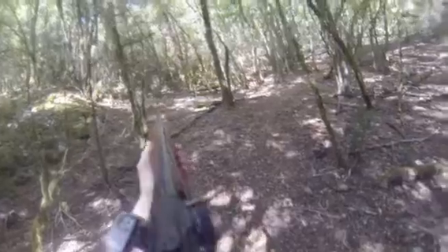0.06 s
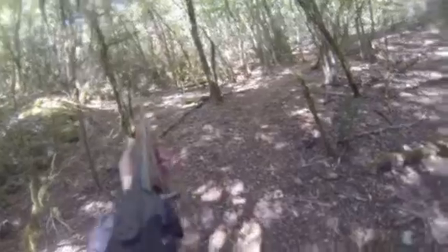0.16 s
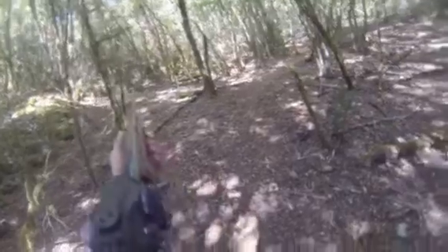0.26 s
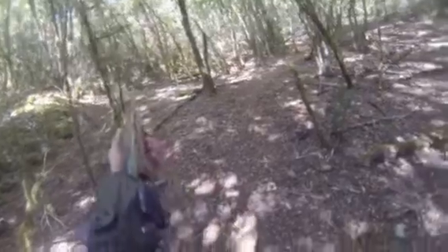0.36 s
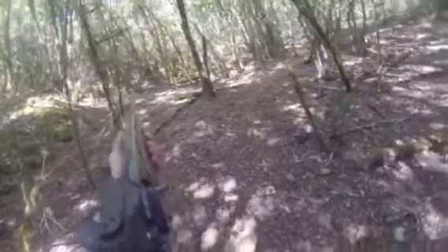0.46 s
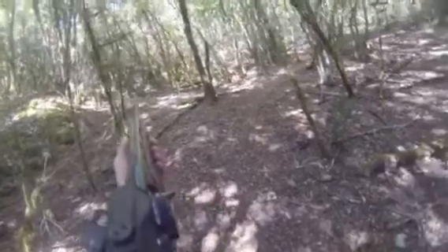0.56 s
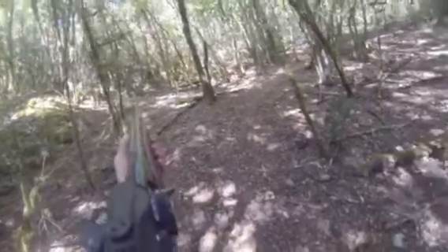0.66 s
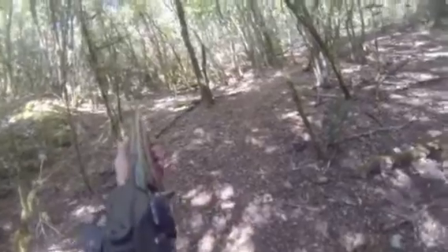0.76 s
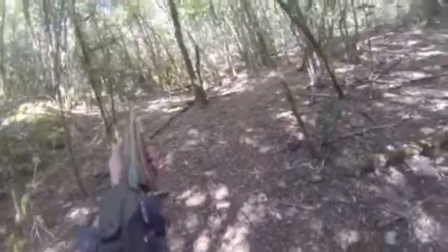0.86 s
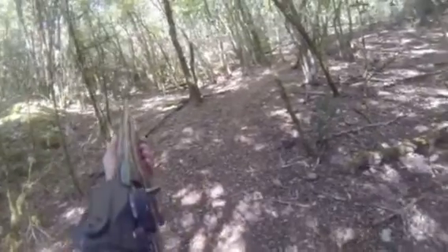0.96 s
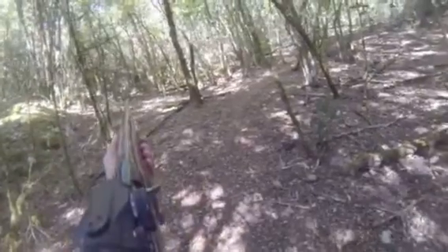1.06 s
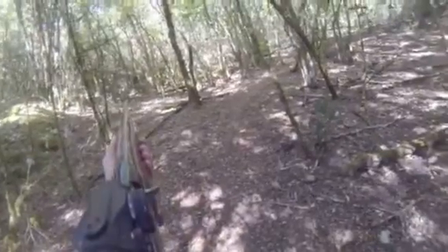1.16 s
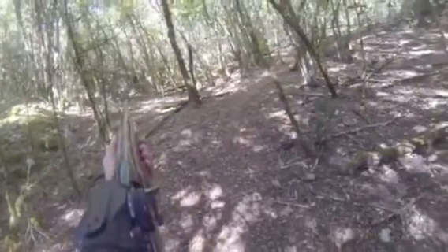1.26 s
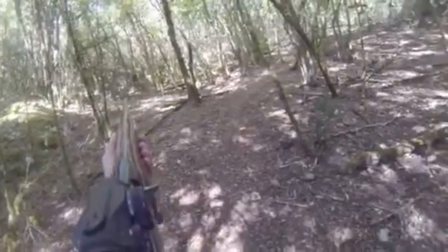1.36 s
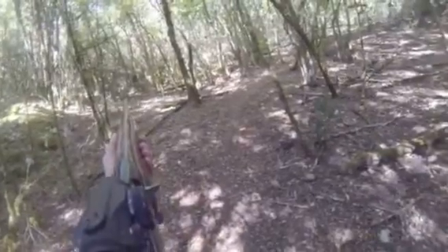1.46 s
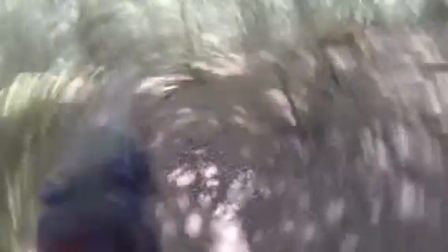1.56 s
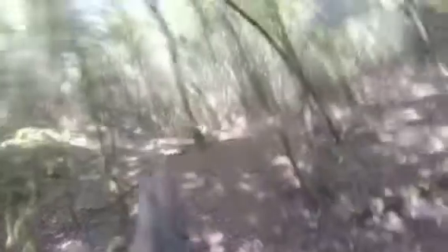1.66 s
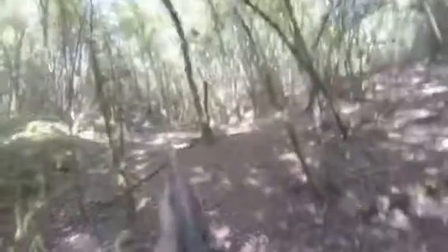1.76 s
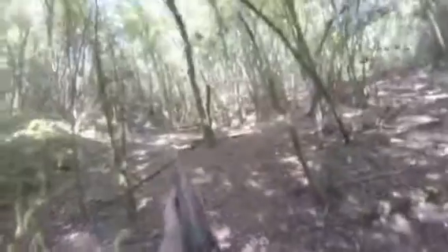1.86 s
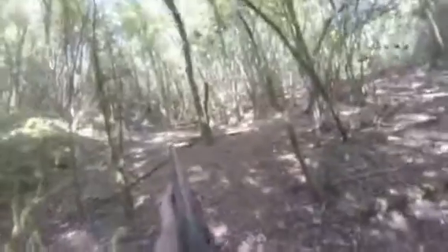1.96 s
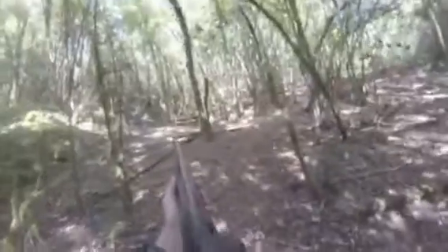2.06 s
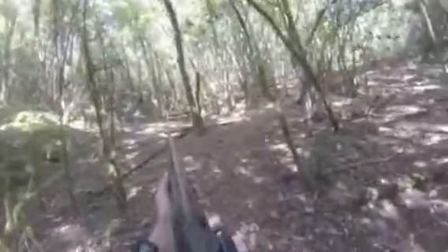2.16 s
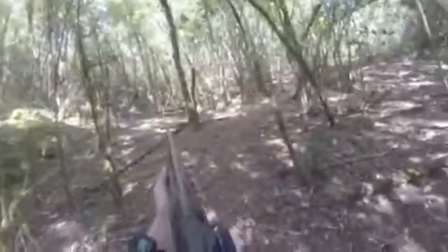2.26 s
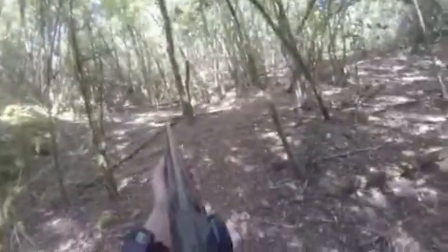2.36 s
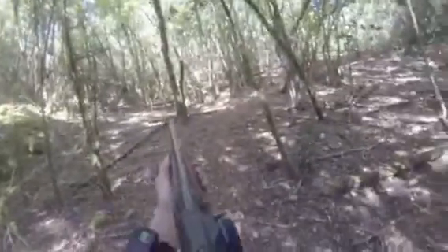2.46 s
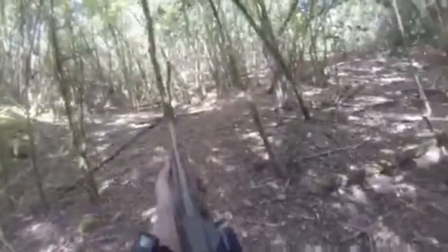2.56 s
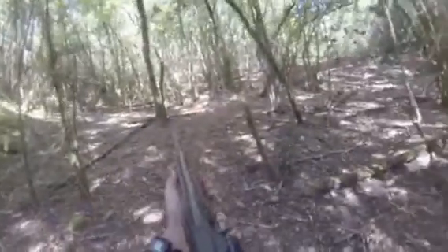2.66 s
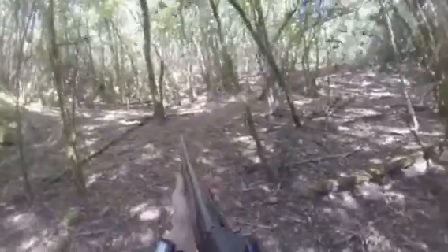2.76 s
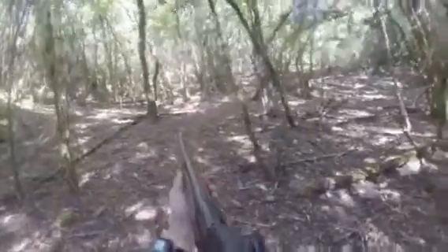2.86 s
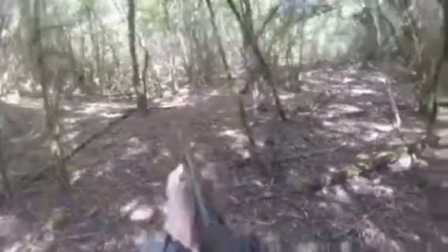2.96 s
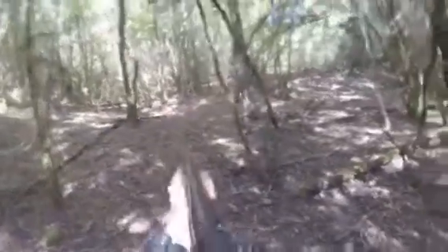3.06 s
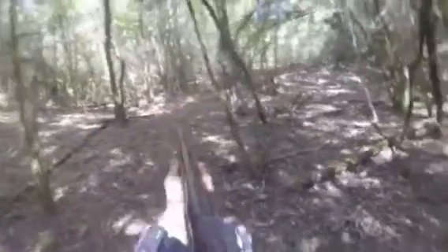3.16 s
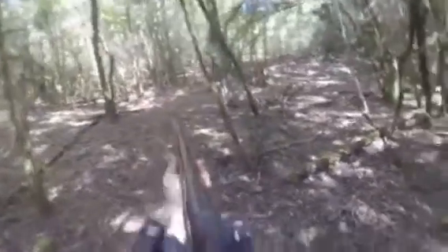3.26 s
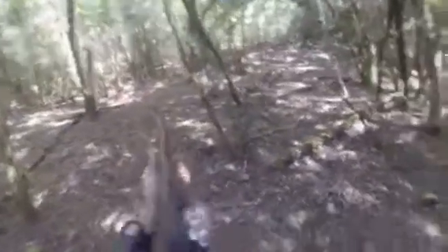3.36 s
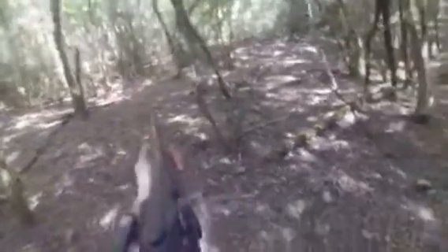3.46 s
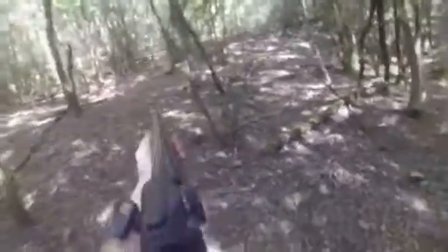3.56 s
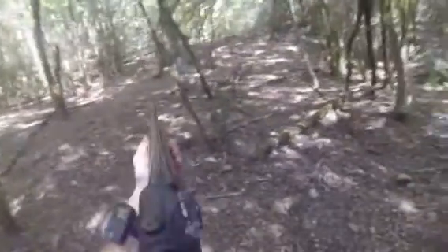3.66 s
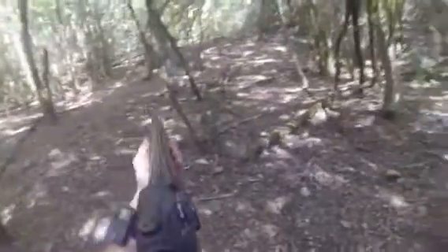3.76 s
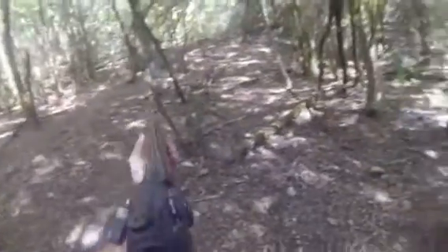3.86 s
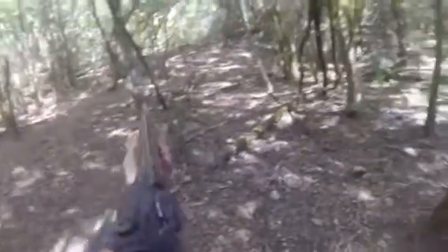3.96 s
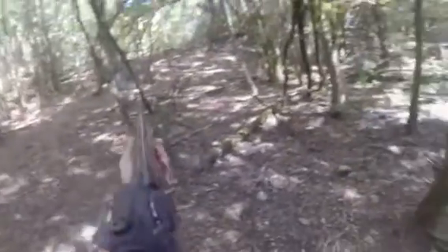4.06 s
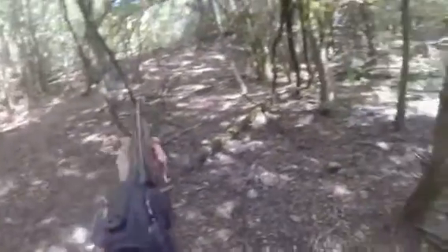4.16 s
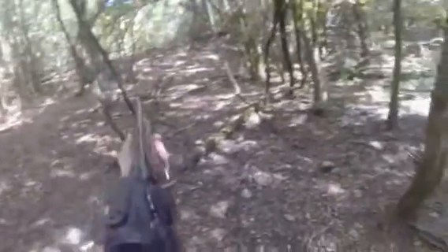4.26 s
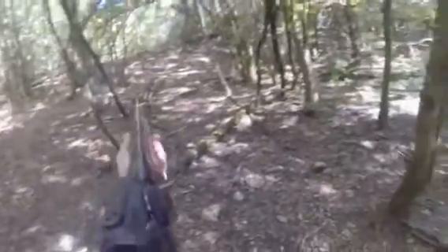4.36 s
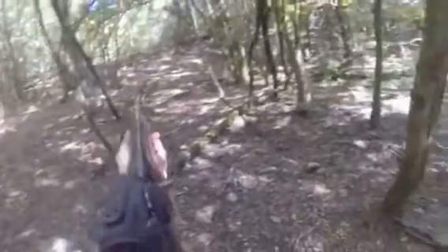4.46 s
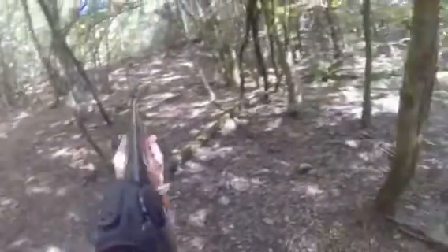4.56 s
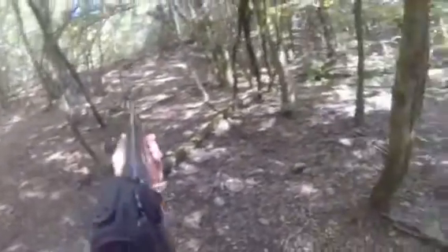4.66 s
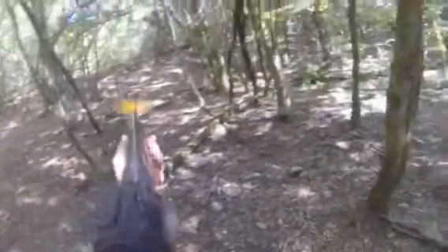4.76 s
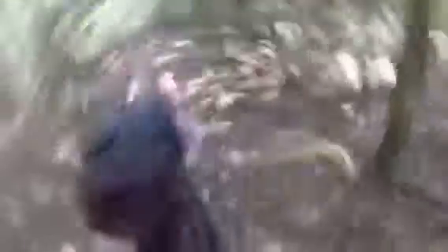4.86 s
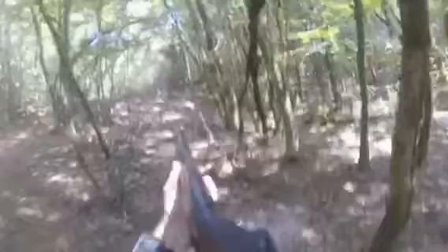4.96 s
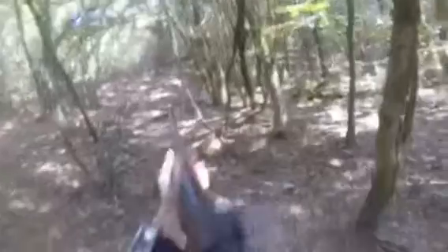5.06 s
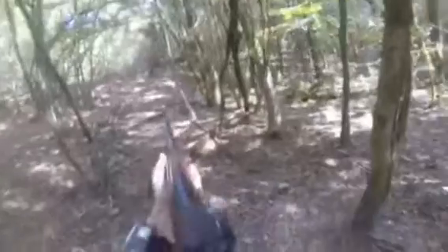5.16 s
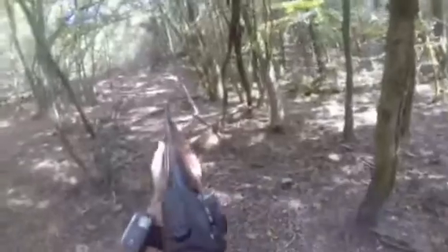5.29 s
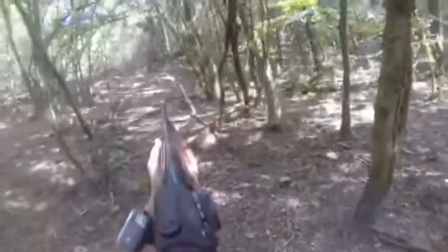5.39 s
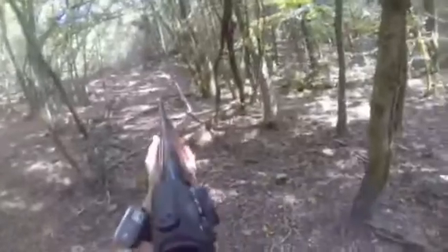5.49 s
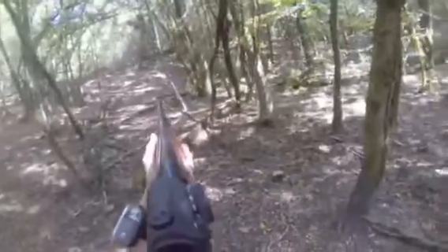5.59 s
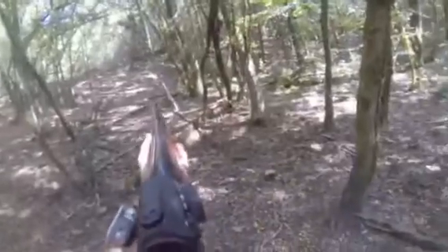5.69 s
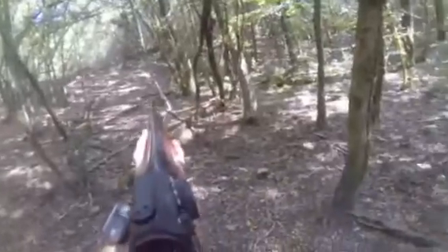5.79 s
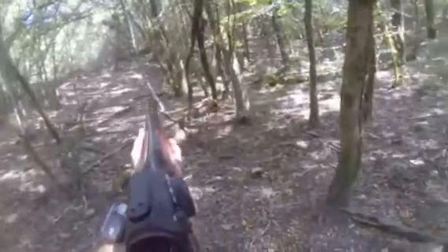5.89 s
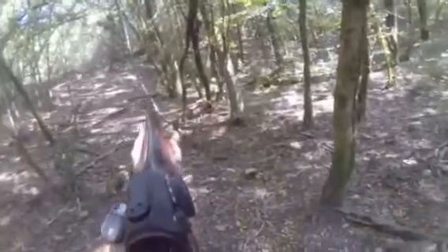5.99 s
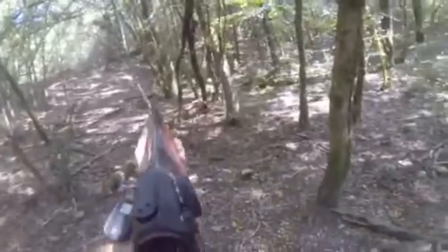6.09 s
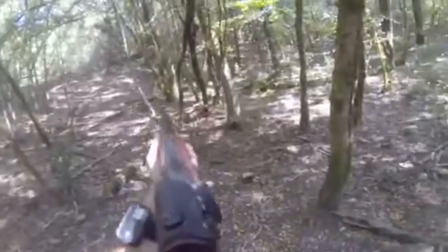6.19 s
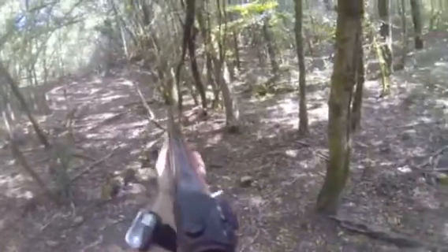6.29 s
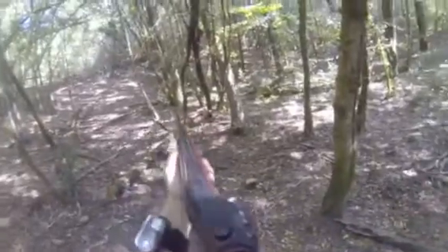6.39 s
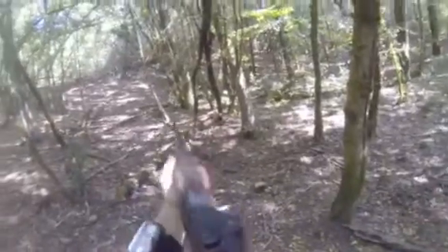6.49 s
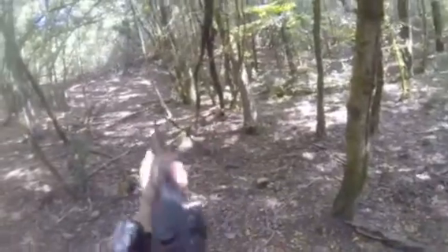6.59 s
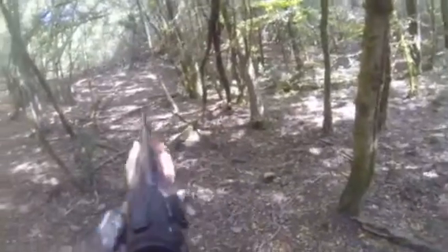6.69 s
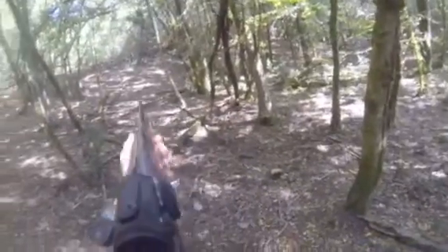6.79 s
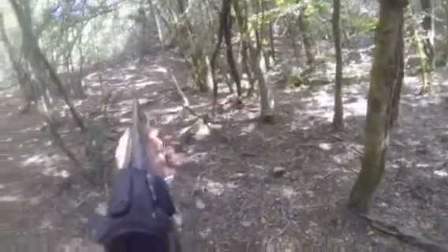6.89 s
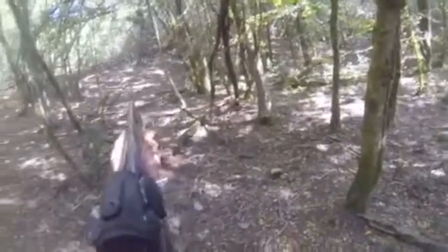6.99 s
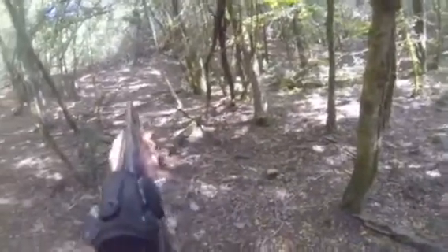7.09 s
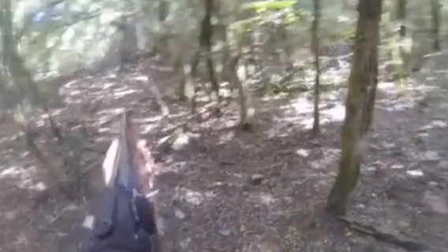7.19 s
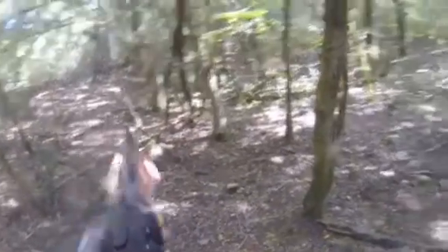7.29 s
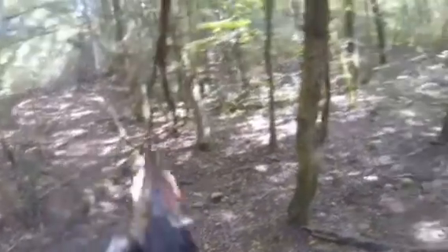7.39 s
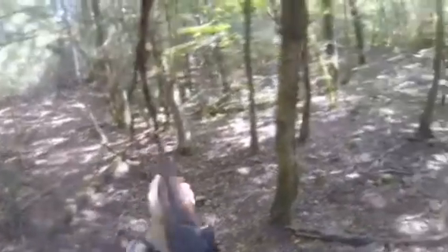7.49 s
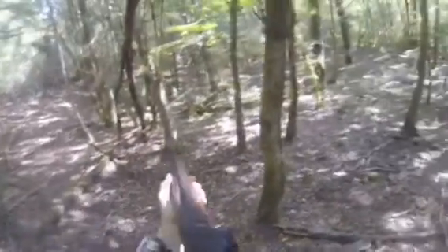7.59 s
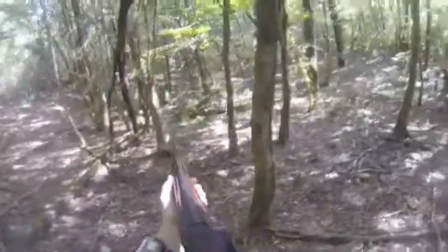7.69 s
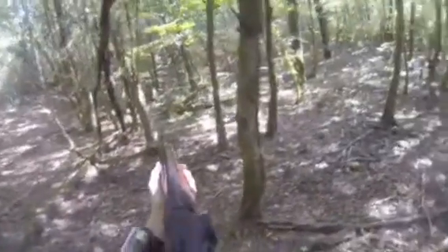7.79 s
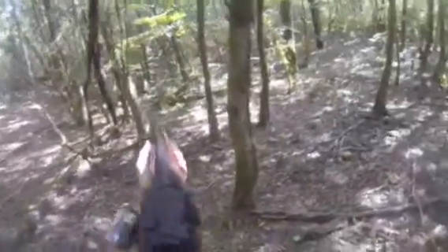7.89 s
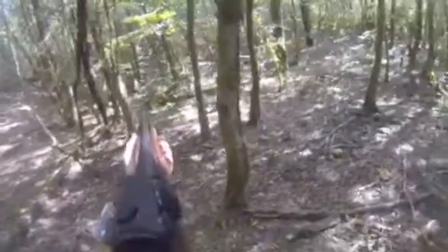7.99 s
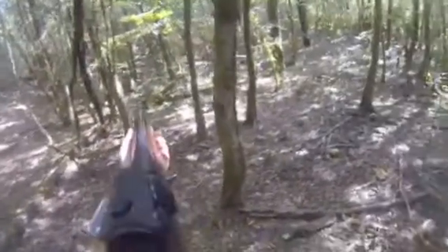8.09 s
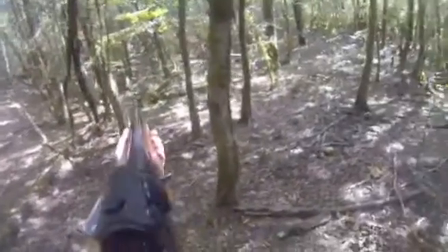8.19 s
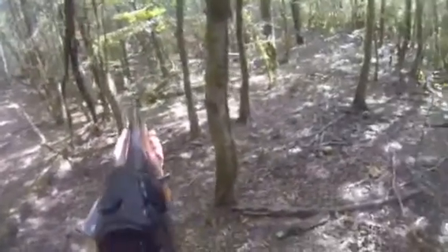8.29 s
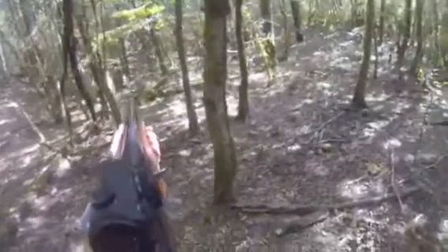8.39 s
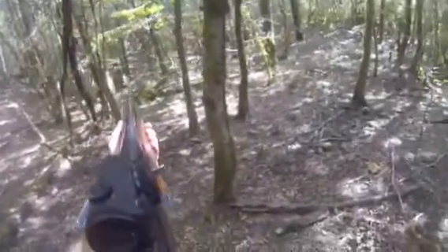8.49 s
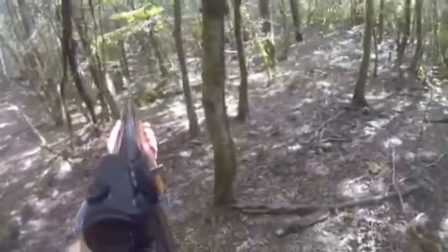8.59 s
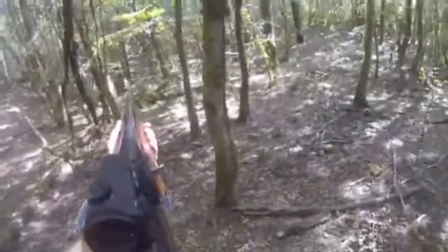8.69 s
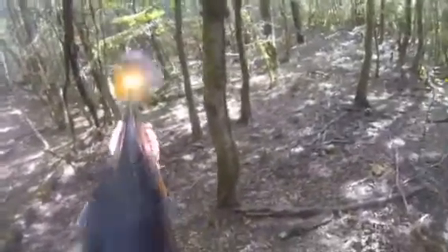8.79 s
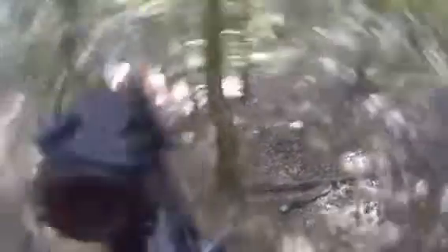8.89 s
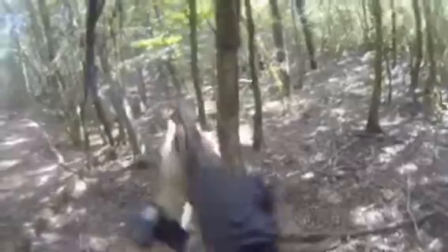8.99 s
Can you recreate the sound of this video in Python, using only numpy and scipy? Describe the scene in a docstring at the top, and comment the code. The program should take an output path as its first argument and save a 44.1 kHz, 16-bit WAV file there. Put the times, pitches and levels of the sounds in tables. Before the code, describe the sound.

A quiet wood gives a soft, steady hush, with a faint shuffle in leaves at the start. At about 1.5 seconds a shotgun fires very close, a sharp crack that overloads the microphone, followed instantly by a slight shell ping and the clack of the bolt closing. The echo swells through the trees and rolls away, growing duller. Around 3 seconds air buffets the microphone with a brief low rumble, and feet crunch softly on dry leaves until about 4 seconds. Faint clothing rustle, twig snaps and small gear clicks continue between shots. A second blast and bolt clack come at 4.8 seconds, with a few hollow, distant slaps in the echo near 5.8 seconds. Light rustling and tiny snaps carry on until the third shot at about 8.9 seconds, which rings into the trees at the end.

```python
"""A quiet wood, a breeze on the microphone and a shuffle in dry leaves; then three shotgun shots.
A small camera on the shooter's head hears the hammer click, the blast overload it and the shell fly out;
after the first two shots the self-loading bolt slams shut. A near bank, the trunks and a far slope throw
each shot back ever duller, while gain control ducks and lets the echo swell up. Between shots the
shooter turns on dry leaves, clothes rustling, twigs snapping and air buffeting the microphone."""
import sys
import numpy as np
from scipy import signal
from scipy.fft import rfft, irfft, next_fast_len
from scipy.io import wavfile
from scipy.ndimage import uniform_filter1d, minimum_filter1d

SR = 44100
rng = np.random.default_rng(int(sys.argv[2]) if len(sys.argv) > 2 else 0)


def file_out(sig):
    """Save sig as 16-bit WAV at sys.argv[1]."""
    # one column per channel
    cols = np.atleast_2d(sig).T
    # limit, then scale
    lim = np.clip(cols, -1, 1)
    pcm = np.round(lim * 32767).astype(np.int16)
    wavfile.write(sys.argv[1], SR, pcm)


N = 398663
T = np.arange(N) / SR


def amp(db):
    """Decibels to gain."""
    return 10 ** (np.asarray(db) / 20)

def add(out, s, x):
    """Mix x into out from time s on."""
    start = int(s * SR)
    out[start:start + len(x)] += x[:N - start]

def over_hz(rows, hz):
    """Straight lines through (Hz, value) rows on a log axis."""
    at, value = np.transpose(rows)
    return np.interp(np.log(hz + 1), np.log(at), value)

def colour(x, db_at):
    """EQ x with the curve db_at(Hz), at rms 1."""
    size = next_fast_len(len(x))
    eq = amp(db_at(np.fft.rfftfreq(size, 1 / SR)))
    y = irfft(rfft(x, size) * eq, size)[:len(x)]
    return y / np.std(y)

def grains(spectrum, size, spread_db=0):
    """Dense clicks of uneven strength with a given spectrum; no spread gives smooth noise."""
    clicks = rng.standard_normal(size)
    clicks *= amp(spread_db * np.minimum(rng.exponential(size=size), 2 * np.pi))
    return colour(clicks, lambda hz: over_hz(spectrum, hz))

def band(size, centre_hz, octaves, dull_hz=np.inf):
    """A bell-shaped band of noise at rms 1, muffled above dull_hz."""
    def eq_db(hz):
        bell = 1 / (1 + (np.log2((hz + 1) / centre_hz) / octaves) ** 2)
        return 20 * np.log10(bell ** 2 / (1 + (hz / dull_hz) ** 6))
    return colour(rng.standard_normal(size), eq_db)

def burst(db, centre_hz, octaves, decay_s):
    """A short knock that dies away in one band."""
    t = T[:SR // 4]
    ring = band(len(t), centre_hz, octaves, dull_hz=10000)
    knock = ring * np.exp(-t / decay_s) * (1 - np.exp(-t / 0.00018))
    return amp(db) * knock * np.sqrt(decay_s * SR / 2 / np.sum(knock ** 2))

def wander(rate_hz, size):
    """A random drift with a spread near 1."""
    knots = rng.standard_normal(size // 20)
    return np.interp(T[:size] * rate_hz, np.arange(len(knots)), knots)

def swells(rows):
    """Summed gain of rounded swells."""
    return sum(amp(db) / (1 + ((T - peak_s) / half_s) ** 4) for peak_s, db, half_s in rows)

def wave(t, peak_s, rise_db_per_s, fall_db_per_s):
    """A gain that climbs to 1 at peak_s and dies away again."""
    return amp(np.minimum(rise_db_per_s * (t - peak_s), fall_db_per_s * (peak_s - t)))

def linger(t, hold_s, fall_db_per_s):
    """A gain that holds at 1, then dies away evenly."""
    return amp(-fall_db_per_s * np.maximum(t - hold_s, 0))


# The woodland bed's tone. Each row: frequency in Hz, relative level in dB.
AMBIENCE_EQ = [(35, -31), (60, 2.5), (152, -7), (305, -8), (849, -14.5), (1590, -18.5), (1740, -18.5),
               (3340, -23.5), (7900, -17.5), (9510, -26.5), (11200, -31), (12000, -35.5), (15500, -41.5)]
def ambience(db=-60.5):
    """The quiet wood: a soft, barely wavering bed of noise."""
    return grains(AMBIENCE_EQ, N) * amp(db + .5 * wander(5.5, N))

# The wind's rumble. Each row: frequency in Hz, relative level in dB.
WIND_EQ = [(15, -6.5), (35, 6), (70, -1.5), (120, -6.5), (200, -17), (400, -28.5), (1500, -79)]
# Gusts as the head turns. Each row: peak in seconds, level in dB, half length in seconds.
GUST_SWELLS = [(.74, -58, 0.026), (2.27, -50.5, .06), (2.81, -37, 0.023), (2.96, -27.5, 0.059),
               (3.1, -32.5, .06), (3.235, -36.5, .085), (3.54, -45, .13), (4.0, -53, 0.088),
               (4.7, -56, .12), (5.54, -45, .06)]
def wind(breeze_db=-59):
    """Air buffets the microphone: a light breeze under the gusts."""
    return grains(WIND_EQ, N) * (amp(breeze_db) + swells(GUST_SWELLS)) * amp(2.8 * wander(25, N))

def whine(hz=10970, db=-78):
    """The camera's electronics whine faintly."""
    return np.sqrt(2) * amp(db) * np.sin(2 * np.pi * hz * T)

def movement(start_s=2.26, attack_s=0.95, hold_s=3.13, release_s=4.54):
    """How busily the shooter moves, 0 to 1."""
    return np.interp(T, np.cumsum([start_s, attack_s, hold_s, release_s]), [0, 1, 1, 0])

# The rustle's hiss. Each row: frequency in Hz, relative level in dB.
RUSTLE_EQ = [(200, -8), (700, -10), (1500, -10.5), (2400, -9.5), (4000, -9.5), (5800, -6.5), (7000, -0.5),
             (8000, -0.5), (10900, -12.5), (12900, -24.5), (15500, -33)]
# Sleeves brush as the gun swings. Each row: peak in seconds, level in dB, half length in seconds.
SLEEVE_SWELLS = [(3.88, -51, 0.077), (4.65, -65, 0.3), (6.14, -55, 0.133), (6.58, -58, 0.043),
                 (7.08, -59, 0.017), (7.44, -62, .04), (8.845, -53, 0.012)]
def rustle(rest_db=-62.5, moving_db=-50.5):
    """Clothes and foliage rub, louder as the shooter moves."""
    level = amp(rest_db + (moving_db - rest_db) * movement()) + swells(SLEEVE_SWELLS)
    return grains(RUSTLE_EQ, N, spread_db=2.5) * level * amp(1.1 * wander(30, N))

# The crisp tone of leaves. Each row: frequency in Hz, relative level in dB.
LEAF_EQ = [(150, 4), (600, 4), (2000, 1), (4500, 1), (7500, 5.5), (10000, -5), (13000, -18), (15500, -29)]
# Foot shuffles. Each row: peak in seconds, level in dB, half length in seconds.
STEP_SWELLS = [(0.007, -50.5, 0.047), (2.67, -49, 0.026), (3.067, -46.5, 0.05), (3.305, -50, 0.084),
               (3.56, -43.5, 0.077), (3.84, -50.5, 0.097), (7.77, -54, 0.081), (8.34, -57, 0.1)]
def footsteps(crackle_db=-7):
    """Dry leaves crunch and crackle under shifting feet."""
    crunch = grains(LEAF_EQ, N, spread_db=4) * amp(4.9 * np.minimum(wander(110, N), 2) - 5.0)
    crackle = grains(LEAF_EQ, N) * amp(6 * np.minimum(wander(700, N), np.e))
    return swells(STEP_SWELLS) * (crunch + amp(crackle_db) * crackle)

def hammer():
    """The hammer falls with a small, broad click."""
    return burst(db=-30.5, centre_hz=4500, octaves=10.0, decay_s=0.0051)

# The crack's tone. Each row: frequency in Hz, relative level in dB.
CRACK_EQ = [(150, -11), (500, -1), (800, 3), (1100, 8), (1500, -1), (3000, -3), (5000, 0.5), (6500, 1.5),
            (8500, 3), (10500, -13), (13000, -22), (15500, -40)]
def muzzle_blast(crack_db=6.0, length_s=0.0091, port_hz=6200, port_db=10, suction_db=7.5, rebound_db=-10):
    """A few milliseconds of shock ring the microphone port; suction follows, then a soft rebound."""
    t = T[:SR // 10]
    crack = grains(CRACK_EQ, len(t)) * (1 - np.exp(-t / 0.000724)) / (1 + (t / length_s) ** 12)
    swell = t / 0.000323
    port = np.sin(2 * np.pi * port_hz * t) * swell * np.exp(1 - swell)
    suction = amp(suction_db) * np.exp(-((t - .0043) / 0.0017) ** 2)
    rebound = amp(rebound_db) * np.exp(-((t - .012) / .007) ** 2)
    return amp(crack_db) * crack + amp(port_db) * port - suction + rebound

# The early scatter's tone. Each row: frequency in Hz, relative level in dB.
THICKET_EQ = [(60, 3.5), (300, 3.5), (900, 0.5), (1600, -1), (2600, -7), (4500, -9.5), (7500, -6.5),
              (10000, -13.5), (13000, -29), (15500, -37)]
def thicket(db=-2, decay_s=0.05):
    """Ground and nearby stems scatter the blast at once, still bright."""
    t = T[:SR // 2]
    return amp(db) * grains(THICKET_EQ, len(t)) * np.exp(-t / decay_s) * (1 - np.exp(-t / 0.0032))

# The tail's starting tone. Each row: frequency in Hz, relative level in dB.
ECHO_EQ = [(30, -9), (130, -13.5), (200, -15), (300, -3), (650, -1.5), (950, -7.5), (1300, -6.5),
           (2200, -9.5), (4200, -10.5), (7500, -2.5), (10000, -8.5), (12500, -20.5), (15500, -37.5)]
# What air and foliage soak up. Each row: frequency in Hz, loss in dB per second.
ECHO_LOSS = [(100, 9), (400, 4), (1000, 5), (2000, 10), (4000, 28), (7000, 54), (14000, 98)]
def wood_echo(trunks_db=-10, slope_db=-23, patchy_db=0.5):
    """Countless trunks answer, then the far slope; the later an echo, the more treble it has lost."""
    t = T[:int(np.pi * SR)]
    hz, delay_s, frames = signal.stft(grains(ECHO_EQ, len(t)), SR, nperseg=512)
    loss_db = np.outer(over_hz(ECHO_LOSS, hz), delay_s)
    echo = signal.istft(frames * amp(-loss_db), SR)[1][:len(t)]
    trunks = amp(trunks_db) * linger(t, hold_s=0.21, fall_db_per_s=29)
    slope = amp(slope_db) * wave(t, peak_s=1.048, rise_db_per_s=35, fall_db_per_s=19.5)
    return echo * np.hypot(trunks, slope) * amp(patchy_db * wander(110, len(t)))

# The low roll's tone. Each row: frequency in Hz before the pitch shift, relative level in dB.
ROLL_EQ = [(60, -45.5), (120, -32.5), (165, -13), (220, -2), (310, 1.5), (420, -2.5), (570, -5),
           (780, -8.5), (1050, -28.5), (3000, -79.5)]
def roll(near_db, far_db, pitch, patchy_db=1.0):
    """Near and distant slopes send back only the low mids, in two lumpy waves."""
    t = T[:int(np.pi * SR)]
    spectrum = [(hz * pitch, db) for hz, db in ROLL_EQ]
    near = amp(near_db) * linger(t, hold_s=0.37, fall_db_per_s=21.5)
    far = amp(far_db) * wave(t, peak_s=1.01, rise_db_per_s=22, fall_db_per_s=37)
    return grains(spectrum, len(t)) * np.hypot(near, far) * amp(patchy_db * wander(35.62, len(t)))

def near_bank():
    """A near bank throws back the body of the blast."""
    t = T[:SR // 2]
    body = band(len(t), centre_hz=520, octaves=0.93)
    return body * wave(t, peak_s=0.051, rise_db_per_s=700, fall_db_per_s=257)

# The shell's ring. Each row: frequency in Hz, relative level in dB, seconds to fade by 60 dB.
SHELL_PARTIALS = [(6560, -4, .25), (9320, 1, 0.17)]
def shell():
    """The thin ping of a spent shell."""
    t = T[:SR // 2]
    return sum(amp(db - 60 * t / t60) * np.sin(2 * np.pi * hz * t) for hz, db, t60 in SHELL_PARTIALS)

# The shots. Each row: start in seconds; trims in dB for blast, near bank, wood echo, near roll
# and far roll; the roll's pitch ratio; the shell's trim in dB.
SHOT_CUES = [(1.5403, -0.5, -12.5, -2, -31, -35, 0.98, -12), (4.828, -3, -8, -2.3, -25.5, -36, 1.0, -20),
             (8.8594, -2, -7, -0.5, -22, -34, 0.9, -27)]
def gunshots(hammer_lead_s=0.0088, eject_s=.026):
    """Each shot sets off its echoes and throws out a shell; one shell is heard landing."""
    out = np.zeros(N)
    for s, blast_db, bank_db, wood_db, near_db, far_db, pitch, shell_db in SHOT_CUES:
        add(out, s - hammer_lead_s, hammer())
        add(out, s, amp(blast_db) * muzzle_blast())
        add(out, s, thicket())
        add(out, s, amp(bank_db) * near_bank())
        add(out, s, amp(wood_db) * wood_echo())
        add(out, s, roll(near_db, far_db, pitch))
        add(out, s + eject_s, amp(shell_db) * shell())
    add(out, 2.39, amp(-60) * shell())  # the landing
    return out

# The bolt closing. Each row: start in seconds, trim in dB.
BOLT_CUES = [(1.625, -7.5), (4.918, -7.5)]
def bolt():
    """The bolt slams shut on the next round; after the last shot it stays open."""
    out = np.zeros(N)
    for s, db in BOLT_CUES:
        clack = burst(db=-1.5, centre_hz=6000, octaves=5.9, decay_s=0.0097)
        thump = burst(db=4.5, centre_hz=430, octaves=0.68, decay_s=0.0028)
        add(out, s, amp(db) * (clack + thump))
    return out

# The featured snaps. Each row: start in seconds, level in dB, band centre in Hz.
TWIG_CUES = [(2.39, -46, 8000), (2.54, -49, 6500), (2.825, -43.5, 7500), (3.22, -37, 5970),
             (4.224, -41, 6500), (4.322, -38, 6000), (4.539, -39, 8000), (5.443, -48, 13000),
             (6.03, -38, 8000), (6.207, -41, 6500), (6.223, -35, 7200), (7.051, -38.5, 8040),
             (7.786, -37.5, 7700)]
def twigs(faint_max_per_s=8.6, faint_max_db=-49, octaves=0.74, decay_s=0.0037):
    """Dry twigs snap brightly; fainter ones break at random while the shooter moves."""
    out = np.zeros(N)
    for s, db, hz in TWIG_CUES:
        add(out, s, burst(db, hz, octaves, decay_s))
    busy = movement()
    for when, luck, strength in rng.random((int(faint_max_per_s * N / SR), 3)):
        if luck < busy[int(when * N)]:
            add(out, when * N / SR, strength * burst(faint_max_db, 7000, octaves, decay_s))
    return out

# Handling clicks. Each row: start in seconds, level in dB, band centre in Hz.
GEAR_CUES = [(3.255, -39.5, 3270), (4.225, -40.5, 1820), (4.748, -46.5, 2200), (4.792, -44, 2800),
             (6.301, -46, 2300), (8.33, -48, 2430), (8.351, -49, 2980)]
def gear():
    """The gun and gear give short, dry clicks."""
    out = np.zeros(N)
    for s, db, hz in GEAR_CUES:
        add(out, s, burst(db, hz, octaves=.55, decay_s=0.0035))
    return out

# Heel drops. Each row: start in seconds, level in dB.
HEEL_CUES = [(3.518, -35), (3.935, -40), (4.03, -50), (7.02, -46.5)]
def heels():
    """Heels thud on soil."""
    out = np.zeros(N)
    for s, db in HEEL_CUES:
        add(out, s, burst(db, centre_hz=185, octaves=1.0, decay_s=0.006))
    return out

# Distant slaps. Each row: peak in seconds, level in dB, half length in seconds.
SLAP_SWELLS = [(5.7, -31, 0.017), (5.77, -31, 0.016), (5.835, -28, .02)]
def slapback():
    """The far slope answers the second shot in a few hollow lumps."""
    return swells(SLAP_SWELLS) * band(N, centre_hz=295, octaves=0.47)


def scene():
    """Gun, shooter and background; one microphone feeds both channels."""
    gun = gunshots() + bolt() + slapback()
    shooter = rustle() + footsteps() + twigs() + gear() + heels()
    background = ambience() + wind() + whine()
    return np.tile(gun + shooter + background, (2, 1))

def gain_control(x, threshold_db=-14, range_db=12, hold_s=0.085, release_db_per_s=58, ahead_s=0.0014):
    """A look-ahead limiter: loud sound ducks the gain at once; after a hold it creeps back up."""
    power = signal.lfilter([1 / 128], [1, 1 / 128 - 1], x[0] ** 2)  # about a 3 ms average
    cut_db = np.clip(10 * np.log10(power + 1e-12) - threshold_db, 0, range_db)
    size = 2 * int(hold_s * SR / 2) + 1
    held_db = -minimum_filter1d(-cut_db, size, origin=size // 2)
    released_db = np.maximum.accumulate(held_db + release_db_per_s * T) - release_db_per_s * T
    smooth_db = uniform_filter1d(released_db, size=64)
    return x * amp(-np.interp(T + ahead_s, T, smooth_db))

def record(dry, top_hz=15500):
    """The camera rides its gain, clips the blast and cuts the top."""
    clipped = np.clip(gain_control(dry), -.85, .85)
    lowpass = signal.ellip(12, .2, 90, top_hz, fs=SR, output="sos")
    return signal.sosfilt(lowpass, clipped)


dry = scene()
out = record(dry)
file_out(out)
```